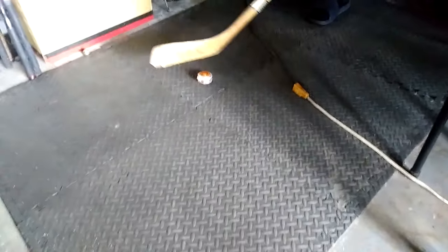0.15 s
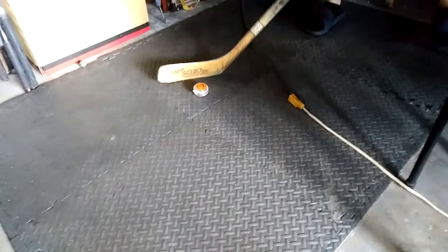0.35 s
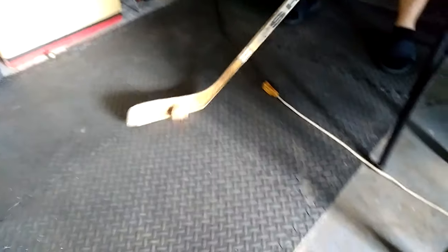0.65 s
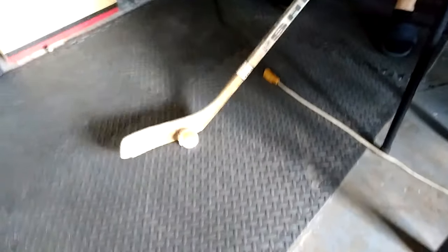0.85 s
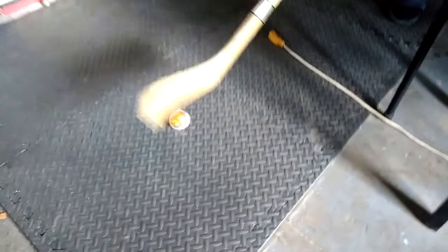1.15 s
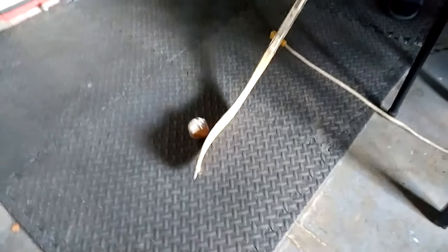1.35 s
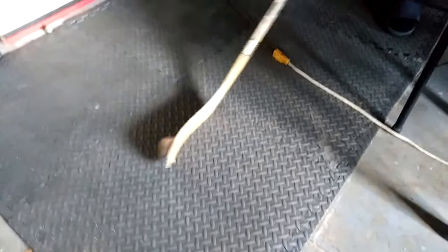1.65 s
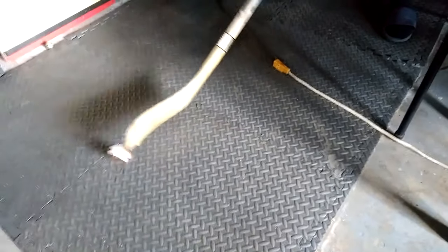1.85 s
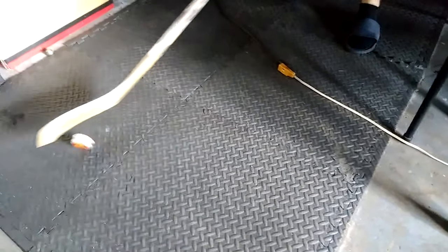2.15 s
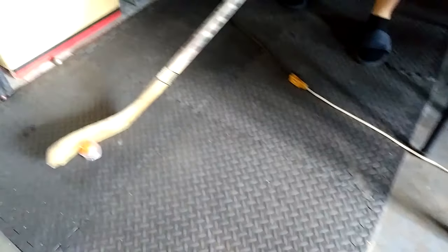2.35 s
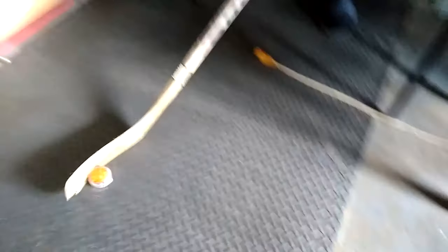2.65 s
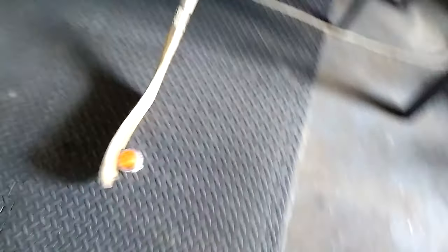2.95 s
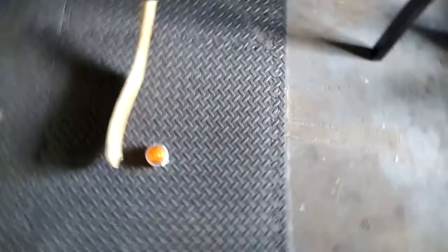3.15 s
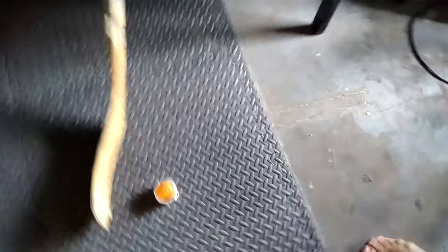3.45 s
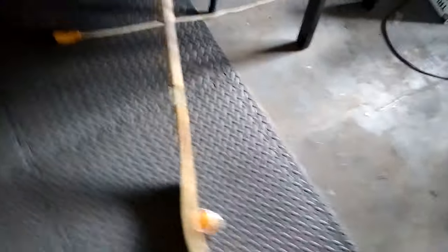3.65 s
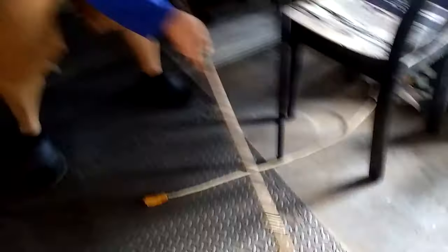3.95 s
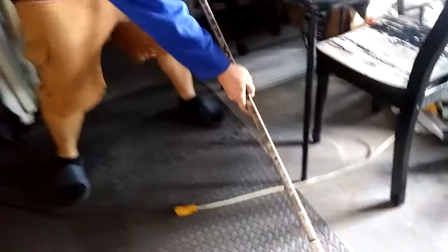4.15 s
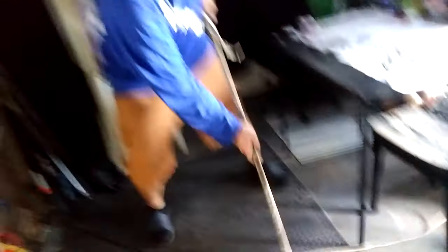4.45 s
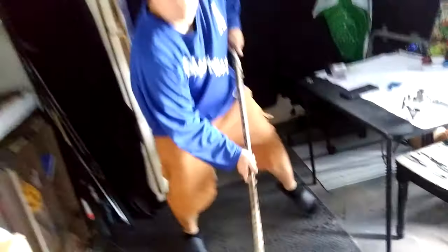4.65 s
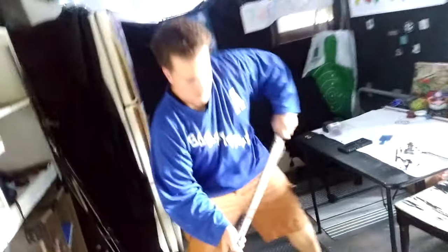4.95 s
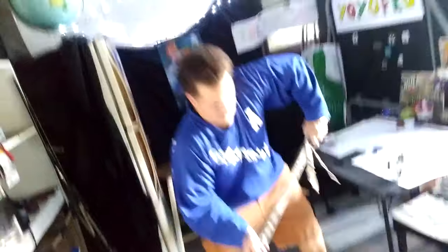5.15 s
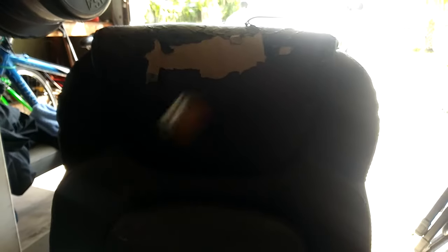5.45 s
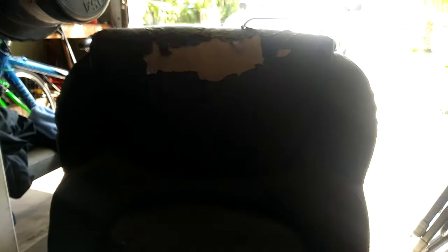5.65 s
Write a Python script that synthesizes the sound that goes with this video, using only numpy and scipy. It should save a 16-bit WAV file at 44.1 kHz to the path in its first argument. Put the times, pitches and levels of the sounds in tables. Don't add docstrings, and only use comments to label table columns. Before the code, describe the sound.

Dry wooden clacks, rough scraping strokes and faint ball rings in a garage, ending in a sudden burst of boards and tins banging.

```python
import sys
import numpy as np
from scipy import signal
from scipy.fft import rfft, irfft
from scipy.io import wavfile

SR = 44100
rng = np.random.default_rng(int(sys.argv[2]) if len(sys.argv) > 2 else 0)


def how_loud(loudness_db):
    steps = np.asarray(loudness_db, float) / 20
    return 10 ** steps


def dump_mix(stems):
    frames = np.atleast_2d(stems).T
    limited = np.clip(frames, -1, 1)
    pcm = np.round(limited * 32767).astype(np.int16)
    wavfile.write(sys.argv[1], SR, pcm)


N = 255780


def rms_one(x):
    return x / np.sqrt(np.mean(x ** 2) + 1e-20)


def at_hz(points, hz):
    points = np.array(points)
    return np.interp(np.log(hz + 1), np.log(points[:, 0]), points[:, 1])


def coloured(x, spectrum):
    cepstrum = irfft(np.log(how_loud(at_hz(spectrum, np.linspace(0, SR / 2, 513)))))
    cepstrum[1:512] *= 2
    cepstrum[513:] = 0
    return signal.fftconvolve(x, irfft(np.exp(rfft(cepstrum))))[:len(x)]


def band(x, low_hz, high_hz):
    return signal.sosfilt(signal.butter(3, [low_hz, high_hz], "band", fs=SR, output="sos"), x)


def poles(hz, width_hz):
    r = np.exp(-np.pi * width_hz / SR)
    return (1 - r * r) / 2 * np.array([1, 0, -1]), [1, -2 * r * np.cos(2 * np.pi * hz / SR), r * r]


def drift(rate_hz):
    r = np.exp(-2 * np.pi * rate_hz / SR)
    return rms_one(signal.lfilter([1], [1, -2 * r, r * r], rng.standard_normal(N + SR))[SR:])


def echoes(patter_db):
    # (frequency [Hz], t60 [s])
    garage = [(200, .3), (600, .28), (1200, .25), (3500, .27), (10000, .22)]
    t = np.arange(SR * 2 // 5) / SR
    uneven_db = patter_db * rng.exponential(1, len(t)) * np.exp(-t / 0.0071)
    patter = rng.standard_normal(len(t)) * how_loud(uneven_db)
    octaves_hz = 150 * 2 ** np.arange(0, 7.)
    tail = sum(band(patter, low, 2 * low) * how_loud(-60 * t / at_hz(garage, np.sqrt(2) * low))
               for low in octaves_hz)
    tail *= np.clip(t / .004 - .3, 0, 1)
    return tail / np.sqrt(np.sum(tail ** 2))


def blows(rows, crack_hz, rooms, contact_s, wood_q, crack_q, echo_db):
    # (frequency [Hz], level [dB per Hz])
    crack_colour = [(1500, -27.5), (2800, 5), (6000, -3.5), (8000, 0), (11000, -16), (16500, -43)]
    out, t = np.zeros(N + SR), np.arange(SR // 20) / SR
    for k, (s, wood_db, wood_hz, crack_db) in enumerate(rows):
        contact = 0.32 * rng.standard_normal(len(t)) * how_loud(-60 * t / contact_s)
        contact[0] = 1
        wood = sum(gain * signal.lfilter(*poles(wood_hz * ratio, wood_hz * ratio / wood_q), contact)
                   for ratio, gain in [(.68, -.6), (1, 1), (1.6, -.2)])
        wood = signal.lfilter(*poles(.85 * wood_hz, 1.4 * wood_hz), wood)
        crack = signal.lfilter(*poles(crack_hz, crack_hz / crack_q), contact)
        crack = coloured(0.15 * contact + crack, crack_colour)
        blow = how_loud(wood_db) * wood / abs(wood).max() + how_loud(crack_db) * crack / abs(crack).max()
        wet = signal.fftconvolve(blow, rooms[k % len(rooms)])
        wet *= how_loud(echo_db) * abs(blow).max() / abs(wet).max()
        wet[:len(t)] += blow
        out[round(s * SR):][:len(wet)] += how_loud(7.0) * wet
    return out[:N]


def chatters(rows, rise_s, fall_db_per_s):
    resonance_q = 6.8
    out, t = np.zeros(N + SR), np.arange(SR // 2) / SR
    for s, length, hz, db in rows:
        rough = np.minimum(rng.exponential(1, len(t) // 90 + 1), 2.5).repeat(90)[:len(t)]
        noise = rng.standard_normal(len(t)) * how_loud(3. * rough)
        sung = signal.lfilter(*poles(hz, 2 * hz / resonance_q), noise)
        sung = signal.lfilter(*poles(hz, hz / resonance_q), sung)
        shape = np.clip(t / rise_s, 0, 1) * how_loud(-fall_db_per_s * np.maximum(t - length, 0))
        out[round(s * SR):][:len(t)] += how_loud(db) * sung / sung[:SR // 10].std() * shape
    return out[:N]


def pressure(strokes, shudders, attack_db_per_s, release_db_per_s, dull_db, hiss_db, rest_db):
    dulling = 0.81
    blade_fall_db_per_s, mat_fall_db_per_s = 292, 237
    t = np.arange(N // 32 + 2) * 32 / SR
    power = how_loud(2 * np.array(rest_db))[:, None] + 0 * t
    for s, length, db, swell_db, bright_db in strokes:
        held_db = db - swell_db * np.clip(1 - (t - s) / length, 0, 1)
        edge_db = attack_db_per_s * np.maximum(s - t, 0) + release_db_per_s * np.maximum(t - s - length, 0)
        tint_db = np.array([[0], [dull_db - dulling * bright_db], [bright_db]])
        power = power + how_loud(2 * (held_db - edge_db + tint_db))
    for s, blade_db, mat_db in shudders:
        age = np.maximum(t - s, 0)
        blade_db = blade_db - blade_fall_db_per_s * age
        mat_db = mat_db - mat_fall_db_per_s * age
        power = power + (t >= s) * how_loud(2 * np.array([blade_db, mat_db, blade_db + hiss_db]))
    return [np.interp(np.arange(N) / SR, t, np.sqrt(p)) for p in power]


def friction(levels, grains_per_s, spread_db, lumpy_db):
    # (frequency [Hz], level [dB per Hz])
    blade_on_mat = [(88, -65), (150, -54), (193, -30.5), (297, -24), (457, -18.5), (524, -16), (805, -11),
                    (1190, -11.5), (1500, -5), (2180, -3), (2450, -4.5), (3550, -6.5), (6640, -10.5),
                    (10000, -20), (12500, -33), (16000, -36.5)]
    blade_hz = [1535, 2550, 4400, 6000, 7600]
    blade_q, singing = 9.5, 0.7
    sizes = how_loud(spread_db * np.minimum(rng.exponential(1, N), 5)) * rng.standard_normal(N)
    slips = rng.random(N) < grains_per_s / SR
    grains = coloured(sizes * slips * how_loud(lumpy_db * drift(45.)), blade_on_mat)
    out = 0
    for level, (low, high) in zip(levels, [(1200, 6500), (120, 1200), (6500, 16500)]):
        wander, part = drift(30.), band(grains, low, high)
        sung = sum(np.roll(wander, k * SR) * signal.lfilter(*poles(hz, hz / blade_q), part)
                   for k, hz in enumerate(blade_hz) if low < hz < high)
        out = out + level * rms_one(how_loud(lumpy_db * wander) * part + singing * sung)
    return out


def garage_air():
    # (frequency [Hz], level [dB per Hz])
    air_colour = [(59, -54), (100, -29), (389, -1.5), (481, 6.5), (570, 1), (705, 0.5), (891, -27),
                  (1170, -16), (4980, -6.5), (16000, -19.5)]
    return how_loud(-69) * rms_one(coloured(rng.standard_normal(N), air_colour))


def hum():
    humming = signal.lfilter(*poles(305, 30), rng.standard_normal(N))
    return how_loud(-73) * rms_one(band(humming, 138.0, 700.0))


def footsteps():
    # (time [s], peak [dB])
    landings = [
        (4.1, -60),
        (4.816, -55),
        (5.016, -39),
        (5.18, -55),
        (5.321, -63),
        (5.495, -24),
        (5.599, -26.5),
        (5.47, -41),
        (5.722, -24),
    ]
    slab_hz, t60_s = 200, 0.12
    out, t = np.zeros(N + SR), np.arange(SR // 3) / SR
    for s, db in landings:
        thud = rms_one(band(rng.standard_normal(len(t)), .7 * slab_hz, 2 * slab_hz))
        out[round(s * SR):][:len(t)] += how_loud(db - 60 * t / t60_s) * np.clip(t / 0.0025, 0, 1) * thud
    return out[:N]


def crash(rooms):
    # (time [s], wood level [dB], wood pitch [Hz], crack level [dB])
    boards = [
        (5.399, -18, 2740, -34),
        (5.492, -10.5, 2550, -5),
        (5.511, -15.5, 1770, -12),
        (5.539, -30, 1970, -26),
        (5.57, -22, 1650, -16),
        (5.588, -13.5, 1980, -26),
        (5.722, -16.5, 2950, -20),
        (5.752, -35, 855, -19),
    ]
    tins = [
        (5.412, -24, 3100, -18),
        (5.431, -38, 2540, -15),
        (5.436, -19, 2870, -21),
        (5.468, -30, 2940, -4.5),
        (5.577, -28, 2880, -18.5),
        (5.637, -35, 1850, -8),
        (5.659, -41, 781, -26),
        (5.69, -17.5, 2020, -25),
    ]
    return sum(blows(rows, crack_hz, rooms, contact_s=0.03, wood_q=16.0, crack_q=3.1, echo_db=-9.0)
               for rows, crack_hz in [(boards, 4500), (tins, 5400)])


def sliding_goods():
    # (start [s], length [s], final level [dB], swell [dB], brightness [dB])
    slides = [(5.383, .007, -16, 0, -12), (5.398, .011, -17, 0, -10), (5.412, .025, -16, 0, -4),
              (5.44, .025, -22, 0, -4), (5.468, .045, -15, -2, -10), (5.515, .025, -18, -2, -12),
              (5.545, .022, -25, -3, -12), (5.572, .015, -15.5, 0, -8), (5.59, .012, -16, 0, -16),
              (5.605, .03, -23, 0, -15.5), (5.638, .033, -16, -1, -5), (5.674, .015, -20, 0, -8),
              (5.691, .006, -16, 0, -10), (5.7, .02, -21, 0, -12), (5.723, .008, -16.5, 0, -12),
              (5.735, .012, -20, 0, -14), (5.75, .009, -18, 0, -10), (5.762, .035, -25, -4, -14)]
    # (time [s], goods level [dB], floor level [dB])
    thumps = [
        (5.381, -24, -32),
        (5.467, -22, -20),
        (5.486, -15, -22),
        (5.571, -24, -18.5),
        (5.596, -28, -17),
        (5.638, -24, -18),
        (5.691, -30, -20),
        (5.723, -40, -14),
        (5.75, -30, -31),
        (5.774, -27, -28),
    ]
    shaken = pressure(slides, thumps, attack_db_per_s=20000., release_db_per_s=800, dull_db=-20.5,
                      hiss_db=-14.5, rest_db=[-120, -120, -120])
    return friction(shaken, grains_per_s=9000., spread_db=1.3, lumpy_db=1.3)


def ball_shell(room):
    # (frequency [Hz], level [dB], t60 [s])
    modes = [(1650, -5, .12), (1825, -8, .14), (1980, -9, .14), (2560, -15, .15), (2790, -12, .2),
             (4250, -7, .07), (4620, -9, .12), (4780, 1, .19), (4960, -10, .12), (5620, -5, .22),
             (6010, -2, .2), (7150, -16, .14), (7880, -18, .14)]
    # (time [s], lower high modes [dB], upper high modes above them [dB], low modes above them [dB])
    strikes = [(0.7468, -36.5, 15, -27), (0.8902, -30, 0, -1), (0.9962, -57, 1, 16.5),
               (1.1528, -37.5, -20, 2.5), (1.2124, -44.5, -8, -4), (1.42, -21.5, -2.5, -24),
               (1.459, -33, -5, 3), (1.607, -34, -18, -5), (1.653, -29, -23, -15), (1.7909, -38, -12, 6),
               (2.0251, -29, -12, -8), (2.316, -51, -8, -12), (2.328, -23.5, 11.5, -14),
               (2.4, -35.5, 8, 11.5), (4.491, -40, -11, -14), (4.543, -55, -15, -15), (4.5794, -45, -6, 4),
               (5.468, -22, -13, -10), (5.494, -10, -18, -2)]
    out, t = np.zeros(N + SR), np.arange(SR // 4) / SR
    for s, ring_db, upper_db, low_db in strikes:
        for hz, db, t60 in modes:
            group_db = low_db if hz < 3500 else upper_db if hz > 5200 else 0
            level_db = ring_db - 7 + group_db + db + 1.5 * rng.standard_normal()
            twin_hz = hz * rng.uniform(1.004, 1.018)
            pair = np.sin(2 * np.pi * hz * t) + .3 * np.sin(2 * np.pi * twin_hz * t)
            out[round(s * SR):][:len(t)] += how_loud(level_db - 60 * t / t60) * pair
    return out[:N] + how_loud(-8.5) * signal.fftconvolve(out, room)[:N]


def ball_ticks(rooms):
    # (time [s], wood level [dB], wood pitch [Hz], crack level [dB])
    ticking = [(.7335, -15.5, 1680, -17), (.748, -19.5, 2540, -12.5), (.886, -35, 1720, -65),
               (.8905, -23.5, 1850, -23), (1.154, -36, 1810, -34.5), (1.212, -46, 1950, -42),
               (1.458, -19, 3180, -23), (1.572, -36.5, 1700, -32), (1.59, -32, 2630, -35),
               (1.61, -28.5, 1720, -25), (1.628, -36, 2150, -40), (1.651, -32, 1970, -36),
               (1.657, -25.5, 1670, -39), (1.668, -29, 1850, -31), (1.683, -28, 2000, -29),
               (1.689, -26.5, 1860, -28), (1.789, -26, 2060, -27.5), (2.025, -35, 1900, -32),
               (2.278, -60, 1950, -42), (2.418, -23, 1490, -27), (3.29, -33, 2100, -44),
               (3.441, -34, 1480, -51), (4.37, -21, 1900, -26), (4.49, -36, 2140, -29),
               (4.545, -48, 2240, -39), (4.577, -46, 2340, -36), (4.582, -40, 2060, -55),
               (4.665, -51.5, 2020, -45), (4.98, -56, 2640, -40.5), (5.382, -10.5, 2480, -26),
               (5.385, -17, 1540, -24)]
    return blows(ticking, 4620, rooms, contact_s=.004, wood_q=4., crack_q=6., echo_db=-10.)


def hard_contacts():
    # (start [s], length [s], pitch [Hz], level [dB])
    bursts = [(.7325, .002, 1600, -17), (.748, .002, 5000, -22), (.4825, .004, 5600, -22),
              (1.418, .003, 9000, -27), (1.459, .002, 9800, -31), (1.459, .002, 3100, -25),
              (1.61, .003, 4300, -23), (1.572, .01, 4800, -36), (1.652, .01, 4700, -34),
              (2.328, .004, 4200, -19), (2.328, .004, 1300, -21), (2.402, .01, 6000, -31),
              (2.515, .004, 1500, -31), (3.306, .03, 1050, -32), (5.432, .002, 8000, -21),
              (5.468, .004, 6300, -14), (5.468, .003, 8000, -23), (5.494, .005, 700, -16),
              (5.638, .003, 8500, -22), (5.639, .01, 5000, -15), (5.417, .004, 7200, -22),
              (.64, .03, 400, -52), (2.335, .045, 1050, -26), (2.335, .04, 4200, -28),
              (3.68, .08, 1050, -33), (5.399, .012, 2500, -17), (5.398, .01, 4700, -22),
              (5.428, .003, 8500, -22)]
    return chatters(bursts, rise_s=.0006, fall_db_per_s=1500)


def heel_knocks(rooms):
    # (time [s], wood level [dB], wood pitch [Hz], crack level [dB])
    heel = [(1.319, -42.5, 1430, -94), (1.353, -35.5, 2780, -38), (1.411, -30.5, 2420, -45),
            (1.4175, -15, 1600, -18), (1.419, -24, 1210, -37), (1.432, -24, 1740, -21),
            (.483, -21.5, 990, -48), (2.33, -24, 1115, -50), (2.516, -32, 990, -60),
            (2.666, -35.5, 900, -60), (2.836, -40, 980, -60), (1.965, -45, 1740, -51),
            (2.084, -45, 2160, -54), (2.329, -33, 3100, -12), (2.511, -40, 1560, -30.5),
            (2.515, -30.5, 1590, -39), (2.664, -27.5, 1530, -30.5), (2.834, -25, 1640, -35),
            (2.9, -36, 1310, -37), (3.304, -19.5, 1280, -30), (3.31, -40, 850, -60),
            (3.666, -20, 1700, -12.5), (3.672, -14, 3040, -27), (3.815, -40.5, 1600, -55),
            (3.948, -48, 2660, -58), (4.035, -46, 2060, -66), (4.08, -51, 1010, -56),
            (4.184, -34, 1490, -38), (4.209, -40.5, 630, -58), (4.707, -59, 1900, -49),
            (4.738, -56, 2010, -48), (4.787, -55, 614, -78), (5.062, -37, 1170, -40)]
    return blows(heel, 4150, rooms, contact_s=.005, wood_q=4., crack_q=5., echo_db=-5.)


def flat_slaps(rooms):
    # (time [s], wood level [dB], wood pitch [Hz], crack level [dB])
    flat = [(.26, -51, 3020, -47), (.333, -39, 1590, -43), (.482, -14, 2300, -12.5), (.586, -29, 1340, -45),
            (.993, -49, 1455, -63), (2.261, -45, 2170, -53), (2.328, -14.5, 1460, -17),
            (2.403, -31, 1510, -29), (2.806, -45, 2720, -39), (3.084, -49, 1820, -46),
            (4.161, -43, 1480, -36.5), (4.366, -32, 1430, -29.5), (4.459, -36, 1630, -32),
            (4.818, -40, 890, -75), (5.012, -33.5, 610, -43), (5.316, -46, 990, -61)]
    return blows(flat, 5970, rooms[::-1], contact_s=.005, wood_q=4., crack_q=5., echo_db=-5.)


def brief_resonances():
    # (start [s], length [s], pitch [Hz], level [dB])
    resonant_chatter = [(0.593, 0.021, 1380, -35.5), (0.635, 0.015, 1480, -44), (0.657, 0.012, 1330, -42),
                        (3.308, 0.05, 820, -38), (3.301, 0.0067, 2430, -39), (2.803, .02, 2730, -37.5),
                        (2.906, 0.098, 2640, -43.5), (3.547, 0.085, 2740, -40.5), (3.56, 0.076, 4460, -41),
                        (3.831, 0.03, 1070, -44.5), (4.273, 0.066, 2640, -43), (4.811, 0.016, 910, -45),
                        (5.06, 0.045, 1260, -45), (5.135, 0.015, 1200, -44), (5.9, 0.018, 1310, -51),
                        (5.384, 0.006, 2550, -17), (5.471, 0.024, 4540, -14), (5.637, 0.016, 5450, -38),
                        (5.69, 0.044, 815, -27.5), (5.693, .01, 1980, -26), (5.598, .015, 1370, -25),
                        (5.519, 0.026, 1930, -27), (1.418, 0.014, 1537, -24), (1.42, 0.016, 4250, -28.5),
                        (.75, 0.0027, 1900, -30), (.484, 0.015, 2210, -24.5), (3.667, 0.01, 4600, -26),
                        (3.673, 0.0044, 1500, -25.5), (1.61, 0.0091, 4240, -32), (2.926, 0.012, 2500, -37.5),
                        (2.84, .02, 2120, -37.5), (.76, 0.023, 2000, -33), (.89, 0.028, 1600, -39.5),
                        (5.59, 0.017, 348, -25), (5.62, 0.018, 900, -25.5), (5.66, 0.042, 380, -30.5),
                        (5.73, 0.028, 523, -24), (5.76, .04, 308, -31), (5.488, 0.0085, 604, -25.5),
                        (5.655, .02, 6300, -22), (5.724, .006, 2900, -21), (5.735, 0.018, 1800, -23.5),
                        (5.412, 0.017, 4600, -24)]
    return chatters(resonant_chatter, rise_s=.003, fall_db_per_s=330)


def blade_drag():
    # (start [s], length [s], final level [dB], swell [dB], brightness [dB])
    strokes = [(.015, 0.0084, -60, -5, 0.5), (.2, 0.05, -56, 33, -1.5), (.36, 0.16, -57, -5, -1),
               (.415, 0.058, -31.5, 8.5, -5.5), (.5, 0.08, -30.5, 0.5, -8.5), (.652, 0.14, -34, 0, -3.5),
               (1.33, 0.087, -40, 14, -7), (1.42, 0.037, -34.5, -3, -2), (1.46, 0.25, -35.5, 5, -4.5),
               (1.94, 0.11, -52, 2, -8), (2.105, 0.043, -49.5, 1, -6.5), (2.17, 0.037, -42, 2, -8),
               (2.26, 0.078, -46, 3, -6), (2.4, 0.38, -42, 1.5, -5), (2.8, 0.21, -41, -2, -6),
               (3.02, 0.049, -46, 0, -9), (3.165, 0.016, -48, 3, -8.5), (3.35, .05, -55, 7, -11),
               (3.45, 0.033, -36, 6.5, -10), (3.55, 0.098, -40.5, -1.5, -8.5),
               (3.69, 0.077, -39.5, -9, -13), (3.82, 0.059, -43.5, -1.5, -11.5),
               (3.94, 0.036, -45, 1, -16.5), (4.07, 0.025, -50.5, -2.5, -16), (4.17, 0.011, -45, -4, -5.5),
               (4.258, 0.17, -31.5, 6, -11), (4.38, 0.1, -40.5, 11, -13), (4.7, 0.025, -53.5, -3, -8),
               (4.875, .03, -53, 1, -11), (4.92, 0.085, -47.5, 9.5, -17), (5.02, 0.2, -45.5, -7, -12.5)]
    # (time [s], blade level [dB], mat level [dB])
    shudders = [(0.334, -41.5, -41.5), (.482, -20, -24.5), (0.732, -25, -39.5), (0.748, -38, -60),
                (0.888, -36.5, -53), (1.418, -27, -37), (1.589, -53, -54), (1.66, -30, -61),
                (2.152, -72, -48), (2.33, -21, -32.5), (2.513, -54, -39), (2.663, -32, -41.5),
                (2.834, -39, -41.5), (2.898, -33.5, -40), (3.305, -36, -37.5), (3.666, -17.5, -28.5),
                (3.832, -42, -40.5), (4.081, -47, -44.5), (4.163, -35, -42.5), (4.37, -30, -34),
                (4.788, -65, -50.5), (4.812, -48, -41), (5.011, -42, -39.5), (5.309, -62, -49)]
    rolling_db = [-63.5, -64, -102]
    pushed = pressure(strokes, shudders, attack_db_per_s=1350.0, release_db_per_s=208, dull_db=-19.5,
                      hiss_db=-19.5, rest_db=rolling_db)
    return friction(pushed, grains_per_s=9000., spread_db=1.3, lumpy_db=.8)


def scene():
    rooms = [echoes(patter_db=6.0) for spot in range(9)]
    rise = np.clip(np.arange(N) / SR / 0.31, 0, 1) ** 2
    background = (0.25 + 1.5 * rise) * garage_air() + rise * hum() + footsteps()
    goods = crash(rooms) + sliding_goods()
    ball = ball_shell(rooms[0]) + ball_ticks(rooms) + hard_contacts()
    blade = heel_knocks(rooms) + flat_slaps(rooms) + brief_resonances() + (.3 + .7 * rise) * blade_drag()
    return (background + goods + ball + blade)[None]


def jolts():
    # (time [s], level, 20 dB below the peak [dB])
    overloads = [
        (0.482, -57),
        (0.734, -44.5),
        (2.322, -57),
        (3.666, -44),
    ]
    clicks = np.zeros(N)
    clicks[[round((s + .0015) * SR) for s, db in overloads]] = how_loud(np.array(overloads)[:, 1] + 20.0)
    return signal.lfilter(np.hanning(60), 1, clicks)


def band_limit(x):
    return signal.sosfilt(signal.butter(12, 16790, fs=SR, output="sos"), x)


def record(dry):
    x = signal.sosfilt(signal.butter(3, 200., "high", fs=SR, output="sos"), dry)
    x = x - 0.38 * signal.lfilter(*poles(3515, 233), x)
    fall_db = 270.0 * np.arange(N) / SR
    over_db = np.maximum(20 * np.log10(abs(x) + 1e-9) + 0.5, 0)
    x = x * how_loud(fall_db - np.maximum.accumulate(over_db + fall_db, axis=1))
    x = x / (1 + (x / .67) ** 8) ** (1 / 8) + jolts()
    x = x + how_loud(-93) * rms_one(band(rng.standard_normal(N), 38.0, 200.0))
    x = signal.sosfilt(signal.cheby2(10, 60, 16900, fs=SR, output="sos"), x)
    return band_limit(x)


dry = scene()
out = record(dry)
dump_mix(out)
```